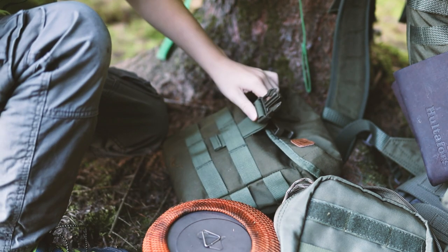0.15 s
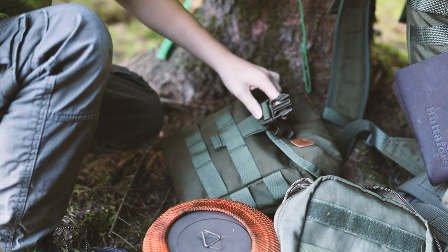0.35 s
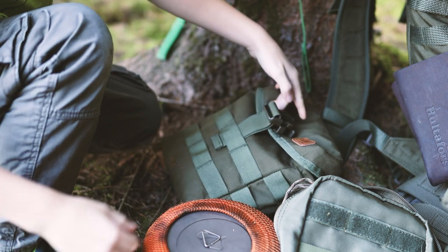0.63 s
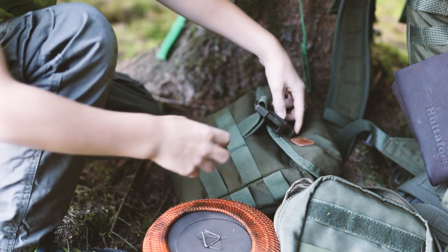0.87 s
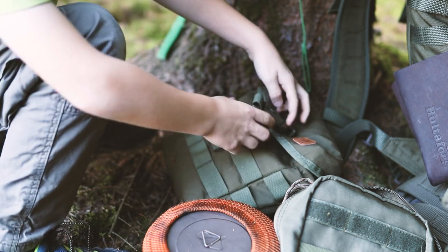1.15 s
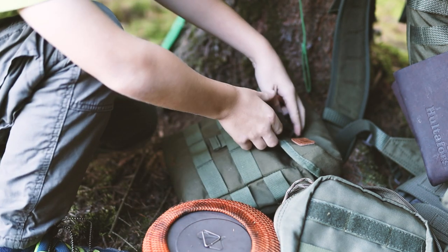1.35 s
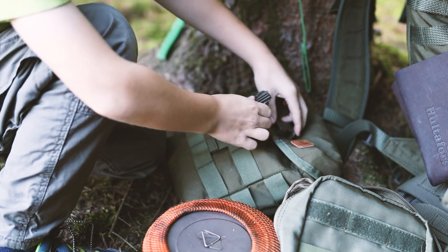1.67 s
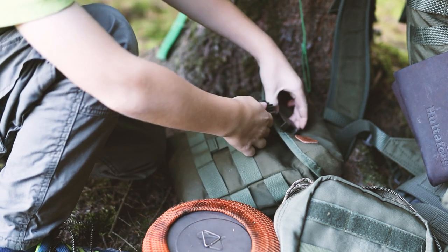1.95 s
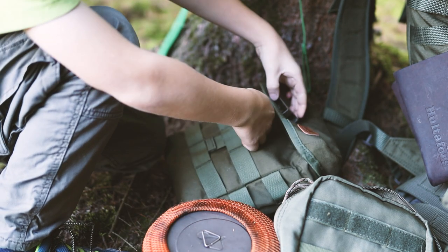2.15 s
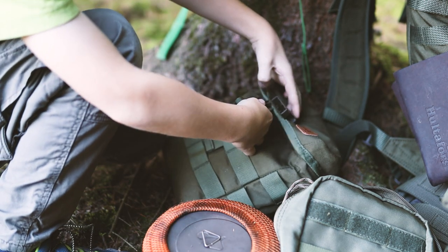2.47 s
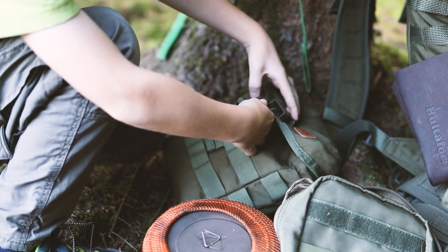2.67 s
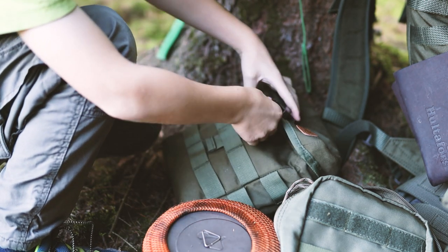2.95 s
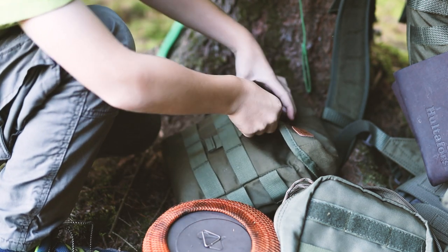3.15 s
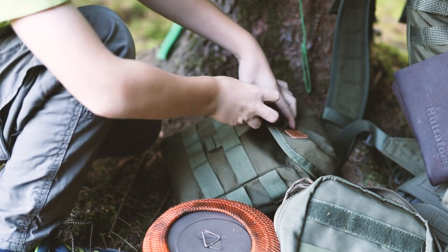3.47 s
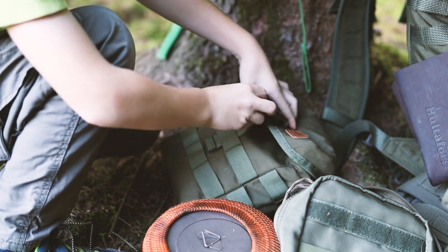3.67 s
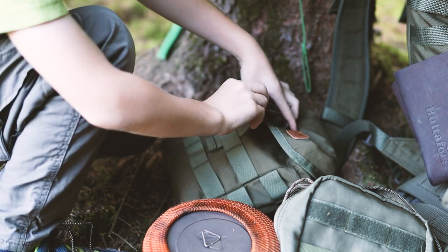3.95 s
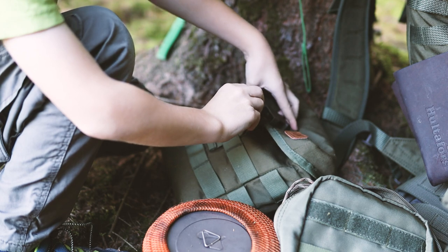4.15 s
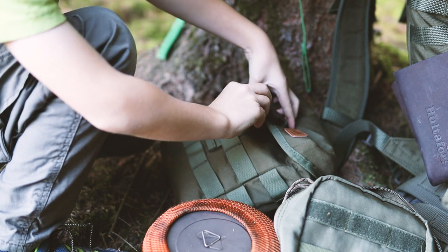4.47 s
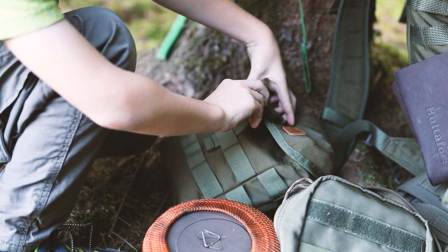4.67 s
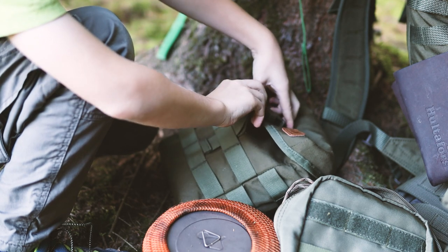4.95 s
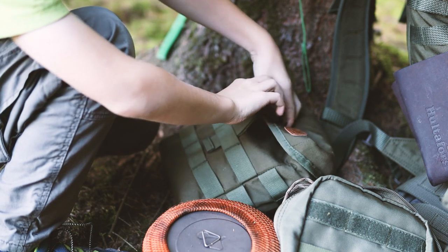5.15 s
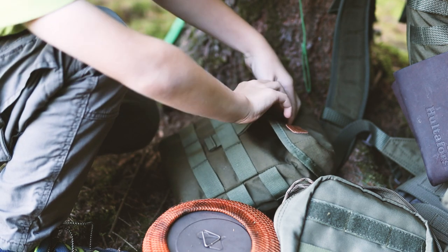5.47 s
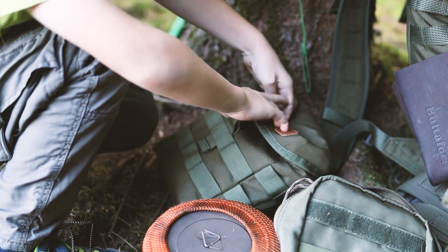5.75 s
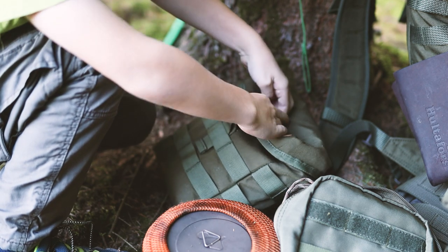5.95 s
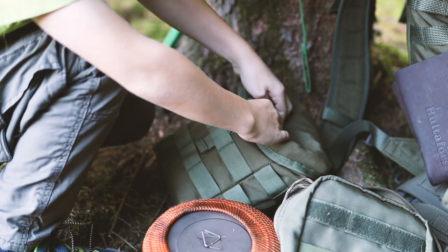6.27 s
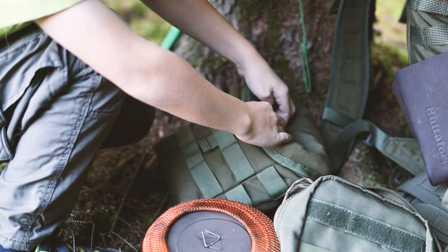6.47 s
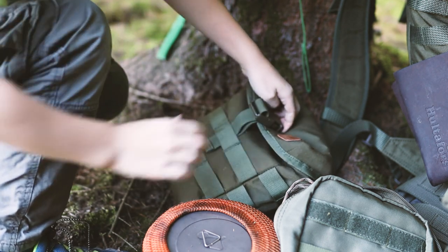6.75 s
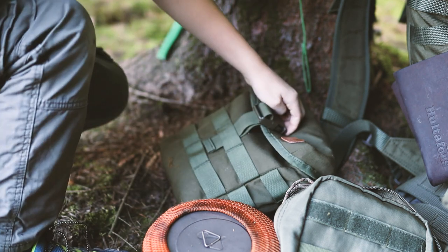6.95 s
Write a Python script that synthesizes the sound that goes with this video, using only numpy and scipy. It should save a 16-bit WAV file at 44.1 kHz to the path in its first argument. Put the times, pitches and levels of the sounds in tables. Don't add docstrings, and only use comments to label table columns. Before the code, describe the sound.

Hands fumble with a plastic buckle, soft cloth rustles and light clicks leading to one loud snap, with faint birdsong in quiet woods.

```python
import sys
import numpy as np
from scipy import signal
from scipy.fft import rfft, irfft
from scipy.io import wavfile
from scipy.ndimage import uniform_filter1d

SR = 44100
rng = np.random.default_rng(int(sys.argv[2]) if len(sys.argv) > 2 else 0)


def level_to_linear(level):
    exponent = np.asarray(level, float) / 20
    return 10 ** exponent


def wrap_up_sound(samples):
    columns = np.atleast_2d(samples).T
    tamed = np.clip(columns, -1, 1)
    steps = np.round(tamed * 32767).astype(np.int16)
    wavfile.write(sys.argv[1], SR, steps)


N = 313992
T = np.arange(N) / SR
SNAP_S, SNAP_DB = 6.2872, -10.5

# frequency [Hz], level [dB], t60 [s].
LATCHED_MODES = [(90, -50.5, 0.054), (172, -27.5, 0.013), (330, -15, 0.017), (554, -21, 0.024),
                 (850, -12, 0.012), (1384, -15.5, 0.014), (1800, -9, 0.028), (2099, -4, 0.025),
                 (2400, -9, 0.037), (2730, -7.5, 0.02), (3370, -1.5, 0.026), (3638, -7.5, 0.029),
                 (3936, -8, 0.027), (4190, -12, 0.027), (4620, -9, 0.02), (4900, -10, 0.027),
                 (5200, -7.5, 0.025), (5488, -6, 0.022), (5800, -8, 0.02), (6410, -12, 0.018),
                 (7120, -12, 0.024), (7560, -8.5, 0.031), (8200, -9, 0.016), (9420, -6, 0.029),
                 (9870, -9, 0.017), (11170, -10, 0.006), (12600, -9, 0.006), (14200, -8.5, .008),
                 (15400, -14, .006)]
# frequency [Hz], level [dB], t60 [s].
BODY_MODES = [(1390, -17, 0.016), (1800, -2.5, 0.01), (2235, -4.5, 0.0093), (2440, 1.5, 0.017),
              (2850, -2.5, 0.0057), (3250, -3.5, 0.0051), (3800, -1, 0.011), (4600, 0, 0.0085)]
# frequency [Hz], level [dB], t60 [s].
WALL_MODES = [(5100, -7.5, 0.0054), (6290, 1, 0.0023), (7000, -6.5, 0.0088), (7500, -1.5, 0.0036),
              (8230, 0, 0.0037), (9770, -8.5, 0.0027), (11700, -11.5, 0.0044), (13790, -11.5, 0.0044)]
# frequency [Hz], level [dB], t60 [s].
PACK_MODES = [(185, -11.5, 0.056), (243, -1, 0.025), (426, 3, 0.016), (646, 4.5, 0.005), (960, 1.5, 0.0053)]

# start [s], peak [dB], thud on the pack [dB], chatter [ms].
CLACKS = [(.8099, -22, -26, 11), (.8788, -36, -14, 3.7), (1.488, -46, -21, 1.7), (4.1624, -51, -11, 6.4),
          (4.8885, -39, -26, 3), (4.8942, -27, -36, 3), (4.9003, -36, -30, 3), (1.3898, -42, -20, 1.5),
          (4.938, -57.5, -4, 3.5), (4.9415, -47, -4, 1.8)]
# start [s], peak [dB], thud on the pack [dB], chatter [ms].
KNOCKS = [(.7035, -39, -14, 3), (1.1088, -39, -12.5, 2.8), (1.275, -40, -41, 3), (.6768, -21, -44, .9),
          (4.8945, -30, -30, 3.5), (4.882, -50, -30, 6), (1.3895, -33.5, -5.5, 36), (1.4203, -36, -24, 8.9),
          (2.2576, -48, -19, 1.3), (2.5752, -50.5, -15, 11), (3.4567, -35.5, -15, 6.1),
          (3.8467, -40, -34, 14), (3.86, -40, -36, 20), (3.8775, -37, -26, 12), (3.9729, -46.5, -23, 5.4),
          (4.121, -37, -29, 3.8), (4.4092, -53, -8, 3.6), (4.436, -48, -22, 4.9), (4.9594, -52.5, -4, 4.5),
          (4.976, -49, -14, 6.8), (5.0217, -49, -10, 11)]
# start [s], peak [dB], thud on the pack [dB], chatter [ms].
SOCKET_KNOCKS = [(.8229, -33, -12.5, 8.4), (1.9709, -39, -9.5, 1.6), (1.9812, -47, 3.5, 5.8),
                 (5.0465, -46.5, -9, 5.3), (4.0655, -53, -9, 2.7), (5.8614, -56, -23, 4.6)]
# start [s], peak [dB], thud on the pack [dB], chatter [ms].
PRONG_TICKS = [(.2773, -44, -1.5, 4), (.3129, -30, -25, 5.5), (1.4136, -36, -12, 2.3),
               (1.5247, -47.5, -21, 3.2), (1.5314, -58, 9.5, 3.1), (3.369, -52, -9, 3.6),
               (3.4126, -43.5, -15, 4.0), (3.862, -33, -35, 16), (4.8945, -24, -27, 2.2),
               (4.4815, -49, -4, 7.3), (5.794, -55, -12, 4.7)]
# start [s], peak [dB], thud on the pack [dB], chatter [ms].
SLIDER_TAPS = [(.028, -60, -15, 2.3), (.264, -48, -3, 3.1), (.2833, -43, -3, 13), (.3006, -38, -24, 9.1),
               (.342, -49, -22, 4.3), (.4628, -51.5, -32, 2.5), (.5222, -54, -25, 3.5),
               (2.27, -55, -10, 4.0), (4.1318, -45, 2.5, 5.8)]
# start [s], peak [dB], thud on the pack [dB], chatter [ms].
HOLLOW_KNOCKS = [(.6774, -24, -32, 1.3), (.6875, -40, -30, 2.3), (.6961, -39, -29, 2.1),
                 (.8012, -46, -30, 2), (.875, -46, -22, 9)]
# start [s], peak [dB], thud on the pack [dB], chatter [ms].
EDGE_TICKS = [(3.486, -38.5, -19, 6), (4.221, -47, -12, 3.7), (4.285, -48, -12, 3.9),
              (4.3306, -55, -18, 2.9), (4.3857, -60, -10, 3), (4.5029, -52, -9, 1.6), (2.493, -59, -18, 3)]
# events, brightness [dB], touched part [Hz], touched part [dB].
CONTACT_KINDS = [
    (CLACKS, 3.1, 2566, -0.76),
    (KNOCKS, -15, 2496, 0.83),
    (SOCKET_KNOCKS, -4, 2500, 1.2),
    (PRONG_TICKS, -8.5, 3850, -0.97),
    (SLIDER_TAPS, -6, 1450, 3),
    (HOLLOW_KNOCKS, -3, 2130, 1.5),
    (EDGE_TICKS, -4, 2820, -2.5),
]

# time [s], effort [dB], lean into the pack [dB].
HANDLING = [(0, -71, 14.5), (.2, -62, 0.5), (.32, -54.5, 12), (.48, -74, 2), (.74, -71.5, 7),
            (.85, -57.5, 15.5), (1.07, -69, -6), (1.38, -59, 7.5), (1.9, -71.5, 6), (2.16, -62.5, 2.5),
            (2.6, -73, 1), (3.8, -86, -0.5), (4.18, -75, -1), (4.7, -75, -3), (5.08, -67, 8.5),
            (5.55, -86, -4), (6.4, -67.5, -0.5), (7.12, -72.5, 6.5)]
# low edge [Hz], high edge [Hz], clumping [dB], level at rest [dB],
# share of effort followed [1], share of lean followed [1].
CLOTH_LAYERS = [
    (169.7, 750, 2, -74, 0.49, 1.0),
    (1100, 8000, 2, -67, 0.96, 0.0),
    (4500, 27000, -0.4, -70.5, 0.18, 0.013),
]
# start [s], length [s], lowest frequency [Hz], level [dB].
STROKES = [(0.274, 0.067, 890, -47.5), (0.845, 0.045, 1480, -54.5), (1.36, 0.079, 1220, -52),
           (1.63, 0.095, 2000, -63), (1.817, 0.054, 1800, -59), (1.98, 0.029, 300, -61),
           (2.563, .045, 1800, -71), (3.104, 0.12, 1800, -65), (3.846, 0.053, 2000, -62.5),
           (4.134, 0.1, 2200, -65), (5.199, 0.091, 1200, -62), (5.483, 0.066, 900, -67.5),
           (5.781, .13, 1210, -59.5), (5.963, 0.21, 1300, -68.5), (5.784, 0.14, 7500, -64),
           (5.792, 0.13, 10500, -67), (6.716, 0.085, 1220, -59.5), (6.811, 0.11, 1800, -60.5)]
# start [s], length [s], centre [Hz], level [dB].
DRAGS = [(0, 0.077, 1230, -65), (1.322, 0.072, 173, -61), (1.734, 0.072, 178, -65),
         (2.09, 0.23, 470, -66.5), (2.152, 0.071, 2120, -66), (2.55, 0.048, 2250, -69),
         (1.746, 0.071, 2300, -68.5), (2.724, .15, 3210, -72.5), (4.121, 0.029, 306, -59),
         (3.454, .014, 1300, -59), (4.886, 0.018, 1100, -54), (4.4, 0.012, 850, -60.5),
         (4.44, 0.0099, 1800, -64), (4.478, 0.0096, 1050, -53.5), (4.479, 0.008, 3750, -52),
         (5.855, .05, 1800, -64), (6.2875, .009, 850, -33), (4.13, .008, 1600, -56),
         (4.676, .005, 6500, -62), (5.01, 0.087, 358, -69), (5.08, 0.17, 3040, -69.5)]
# start [s], length [s], level [dB].
SQUEAKS = [(3.852, 0.045, -50.5), (4.445, 0.036, -60.5)]
# frequency [Hz], t60 [s], level [dB].
WEAVE_MODES = [(2300, 0.0034, -4.5), (4000, 0.00076, 0), (7500, 0.00057, 2), (13000, 0.00049, -7.5)]
# time [s], slip rate [1/s], level [dB].
CREAK = [
    (1.335, 200, -61),
    (1.36, 420, -53.5),
    (1.385, 430, -49),
    (1.4, 870, -41.5),
    (1.412, 840, -48),
    (1.42, 870, -85),
]

# start [s], length [s], start [Hz], top [Hz], level [dB].
HOOKS = [(1.469, 0.062, 4180, 4640, -56.5), (3.177, 0.082, 3900, 4210, -57), (3.37, 0.063, 3810, 4140, -54),
         (3.542, 0.051, 3830, 4020, -58), (4.2, 0.0545, 4000, 4660, -53.5), (4.476, 0.05, 6000, 6800, -64),
         (4.53, .11, 6500, 6700, -72), (1.163, .04, 6300, 6850, -64), (1.254, .04, 6200, 6850, -60),
         (6.778, 0.047, 3800, 4180, -58.5)]
# start [s], length [s], start [Hz], end [Hz], level [dB].
SLIDES = [(1.17, .03, 5000, 5100, -69), (1.505, .04, 5150, 5100, -66), (4.445, .03, 4300, 6000, -71),
          (2.082, 0.075, 8330, 7400, -60.5), (2.71, .068, 7700, 7600, -78), (3.235, 0.07, 6160, 4500, -65),
          (3.345, .03, 3250, 3850, -70), (3.503, .04, 3200, 3850, -66), (3.667, .045, 3140, 3830, -71),
          (3.708, .045, 3860, 4100, -60.5), (4.165, 0.042, 4600, 7500, -70),
          (4.175, 0.033, 2700, 4000, -66), (4.18, .018, 4100, 5500, -67), (4.197, .022, 5500, 5550, -66),
          (5.585, .03, 7200, 6400, -70), (5.7, 0.043, 7400, 6450, -63), (5.848, .057, 7000, 5240, -64),
          (5.995, 0.045, 6700, 5960, -65), (6.035, .015, 5800, 7300, -69), (6.02, .03, 2200, 3800, -71),
          (5.797, .05, 3800, 3800, -68), (6.104, 0.012, 4080, 4750, -58), (6.74, 0.058, 5210, 6400, -64)]
# start [s], level [dB].
CHIRPS = [(2.217, -59), (2.312, -59.5), (2.418, -62)]
# lag [s], length [s], start [Hz], end [Hz], level [dB].
CHIRP_STROKES = [
    (0, 0.03, 5300, 6000, -1.5),
    (0.022, .017, 5250, 7040, -2),
    (0.035, .014, 5300, 5800, -1),
]
# start [s], length [s], start [Hz], top [Hz], end [Hz], level [dB].
ARCH = (6.051, .044, 3996.5, 4786.5, 4149, -54.5)
# start [s], length [s], centre [Hz], level [dB].
TRILLS = [(3.092, 0.088, 7970, -62), (3.292, 0.12, 8030, -58), (3.469, 0.1, 7840, -57),
          (3.642, 0.11, 7850, -59), (3.827, 0.12, 7870, -56), (4.01, 0.097, 7700, -58.5)]

# frequency [Hz], t60 [s].
WOODS_T60_S = [(200, .15), (1000, .35), (2000, .5), (3500, .58), (6000, .4), (7500, .33), (10000, .24),
               (15000, .1)]
# frequency [Hz], density [dB per Hz].
HISS_DB_PER_HZ = [(15, -39.5), (25, -21.5), (123, -2.5), (180, -5.5), (463, -9), (560, -8.5), (659, -11),
                  (1290, -9.5), (1650, -13.5), (2990, -14), (4250, -17.5), (13200, -21.5), (16000, -19.5)]
# frequency [Hz], skirt width [Hz], level [dB].
HUM_LINES = [(59.9, 5.0, -77), (118.3, 12, -73.5)]


def in_time(rows):
    s, *columns = np.transpose(rows)
    return [np.interp(T, s, c) for c in columns]


def rms_one(x):
    return x / np.sqrt(np.mean(x ** 2) + 1e-20)


def at_hz(points, hz):
    table_hz, value = np.transpose(points)
    return np.interp(np.log(hz), np.log(table_hz), value)


def band(x, low_hz, high_hz):
    sos = signal.butter(2, [low_hz, min(high_hz, 19000)], "band", fs=SR, output="sos")
    return signal.sosfilt(sos, x)


def drift(rate_hz):
    r = np.exp(-2 * np.pi * rate_hz / SR)
    noise = rng.standard_normal(N + SR)
    return rms_one(signal.lfilter([1], [1, -2 * r, r * r], noise)[SR:])


def ring(clicks, hz, t60_s):
    r = level_to_linear(-60 / (t60_s * SR))
    w = 2 * np.pi * hz / SR
    return signal.lfilter([0, np.sin(w)], [1, -2 * r * np.cos(w), r * r], clicks + 1e-18)


def chatter(ms, per_s):
    age_s = np.arange(1024) / SR
    slips = rng.standard_normal(1024) * (rng.random(1024) < per_s / SR)
    slips[0] = 3.2
    slips *= np.exp(-age_s * 1000 / max(ms, .3))
    slips *= np.interp(age_s, [0, .001], [.75, 1])
    return slips / np.sqrt(np.sum(slips ** 2))


def strike(modes, starts_s, levels_db, runs, spread_db):
    out = np.zeros(N)
    luck = rng.standard_normal((len(starts_s), len(modes)))
    for k, (hz, mode_db, t60_s) in enumerate(modes):
        drive = np.zeros(N + 1024)
        for s, db, run, z in zip(starts_s, levels_db, runs, luck[:, k]):
            i = round(s * SR)
            drive[i:i + 1024] += level_to_linear(db + mode_db + spread_db * z) * run
        out += (-1) ** k * ring(drive[:N], hz, t60_s)
    return out


def snap():
    starts_s = SNAP_S + np.array([0, .0007, .0026, .0046, .0105, .016])
    levels_db = SNAP_DB + np.array([-8.0, 4.0, -12.5, -12.5, -19.5, -24.5])
    runs = [chatter(ms=.6, per_s=5000.0) for _ in starts_s]
    shell = strike(LATCHED_MODES[5:], starts_s, levels_db, runs, spread_db=2.0)
    blow = [chatter(ms=.3, per_s=0)]
    thud = strike(LATCHED_MODES[:5], [SNAP_S + 0.00056], [SNAP_DB - 3.0], blow, spread_db=-6.0)
    return shell + thud


def grit():
    age_s = T - SNAP_S - .0004
    rattle = rms_one(band(rng.standard_normal(N), 5800, 14500))
    return level_to_linear(-15.5) * rattle * (age_s > 0) * level_to_linear(-60 * np.abs(age_s) / .035)


def buckle():
    contacts = [(*row, *kind) for rows, *kind in CONTACT_KINDS for row in rows]
    s, peak_db, thud_db, ms, bright_db, touched_hz, touched_db = np.transpose(contacts)
    runs = [chatter(m, per_s=9000.0) for m in ms]
    shell = strike(BODY_MODES[:5], s, peak_db - 7.0, runs, spread_db=4.5)
    shell += strike(BODY_MODES[5:], s, peak_db - 9.0 + 0.067 * bright_db, runs, spread_db=1.5)
    shell += strike(WALL_MODES, s, peak_db + bright_db + 0.5, runs, spread_db=2.5)
    for start_s, db, run, hz in zip(s, peak_db + touched_db, runs, touched_hz):
        i = round(start_s * SR)
        shell[i:i + 1024] += level_to_linear(db) * ring(run, hz, t60_s=0.012)
    blows = [chatter(ms=.3, per_s=0)] * len(s)
    thuds = strike(PACK_MODES, s, peak_db + thud_db + 2.0, blows, spread_db=3.5)
    return band(shell, 1370, 19000) + band(thuds, 112, 4000)


def grains(count, per_s, uneven_db):
    sizes = level_to_linear(uneven_db * np.minimum(rng.exponential(1, count), 5))
    signs = rng.choice([-1, 1], count)
    return sizes * signs * (rng.random(count) < per_s / SR)


def cloth():
    out = np.zeros(N)
    clumps = drift(25.0)
    effort_db, lean_db = in_time(HANDLING)
    hands_at_rest_db = -70
    for low_hz, high_hz, clump_db, rest_db, effort_share, lean_share in CLOTH_LAYERS:
        caught = grains(N, per_s=1100.0, uneven_db=-1.0)
        level_db = rest_db + effort_share * (effort_db - hands_at_rest_db) + lean_share * lean_db
        out += level_to_linear(level_db - 5.0 + clump_db * clumps) * rms_one(band(caught, low_hz, high_hz))
    return out


def rubs():
    out = np.zeros(N)
    drag = level_to_linear(2.7 * drift(60.0))
    catches = grains(N, per_s=4700.0, uneven_db=1.5)
    caught = 0.35 * rms_one(catches)
    for hz, t60_s, db in WEAVE_MODES:
        caught = caught + level_to_linear(db) * rms_one(ring(catches, hz, t60_s))
    rows = [(s, d, hz, max(10500, 1.2 * hz), db) for s, d, hz, db in STROKES]
    rows += [(s, d, 2480, 2584, db) for s, d, db in SQUEAKS]
    rows += [(s, d, hz / 1.2, hz * 1.2, db) for s, d, hz, db in DRAGS]
    for s, length_s, low_hz, high_hz, db in rows:
        i, j = max(round(s * SR), 0), round((s + length_s) * SR)
        stroke = np.sin(np.pi * np.arange(j - i) / (j - i)) ** 0.32
        out[i:j] += level_to_linear(db) * stroke * drag[i:j] * rms_one(band(caught[i:j], low_hz, high_hz))
    return out


def creak():
    per_s, level_db = in_time(CREAK)
    turn = 2 * np.pi * np.cumsum(per_s * (1 + 0.089 * drift(216.0))) / SR
    sounding = (T > CREAK[0][0]) & (T < CREAK[-1][0])
    pulses = np.sin(turn) + 0.4 * np.sin(2 * turn)
    return level_to_linear(level_db) * sounding * pulses * level_to_linear(3.3 * drift(140.0))


def note(s, length_s, hz, db):
    i, j = round(s * SR), round((s + length_s) * SR)
    part = np.arange(j - i) / (j - i)
    hoarse_hz = 55.0 * rms_one(uniform_filter1d(rng.standard_normal(j - i), size=90))
    flutter = level_to_linear(2.5 * rms_one(uniform_filter1d(hoarse_hz, size=500)))
    tone = np.sin(2 * np.pi * np.cumsum(hz(part) + hoarse_hz) / SR)
    out = np.zeros(N)
    out[i:j] = level_to_linear(db) * np.sin(np.pi * part) ** .5 * flutter * tone
    return out


def birds():
    slides = list(SLIDES)
    for s, db in CHIRPS:
        slides += [(s + lag_s, d, a, b, db + rel_db) for lag_s, d, a, b, rel_db in CHIRP_STROKES]
    bends = [ARCH]
    for s, d, a, b, db in slides:
        halfway = 0.64 if b > a else .21
        bends.append((s, d, a, a + (b - a) * halfway, b, db))
    out = np.zeros(N)
    for s, d, a, middle, b, db in bends:
        curve = np.polyfit([0, .5, 1], [a, middle, b], 2)
        out += note(s, d, lambda p: np.polyval(curve, p), db)
    for s, d, a, top, db in HOOKS:
        out += note(s, d, lambda p: top - (top - a) * np.exp(-p / 0.28) - 60 * p ** 2, db)
    return out


def buzzer():
    dip_hz, wobble_hz, wobbles_per_s = 480, 290, 75.0
    out = np.zeros(N)
    for s, d, centre_hz, db in TRILLS:
        def pitch(p):
            floor = centre_hz - dip_hz + 750 * np.exp(-p / 0.09) + 260 * p
            width = wobble_hz * np.clip((p - .15) / .3, 0, 1)
            return floor + width * (1 - np.cos(2 * np.pi * wobbles_per_s * d * p))
        out += note(s, d, pitch, db)
    return out


def woods(x):
    age_s = T[:SR]
    tail = np.zeros(SR)
    for low_hz in 150 * 2 ** np.arange(0, 7, .25):
        t60_s = at_hz(WOODS_T60_S, low_hz * 2 ** .125)
        tail += band(rng.standard_normal(SR), low_hz, low_hz * 2 ** .25) * level_to_linear(-60 * age_s / t60_s)
    tail *= np.clip((age_s - .018) / 0.024, .12, 1)
    return signal.fftconvolve(x, tail / np.sqrt(np.sum(tail ** 2)))[:N]


def hiss():
    hz = np.maximum(np.arange(N // 2 + 1) * SR / N, 10)
    spectrum = rfft(rng.standard_normal(N)) * level_to_linear(at_hz(HISS_DB_PER_HZ, hz))
    return level_to_linear(-67) * rms_one(irfft(spectrum, N))


def hum():
    out = np.zeros(N)
    for line_hz, width_hz, db in HUM_LINES:
        t60_s = np.log(1000) / np.pi / width_hz
        skirt = rms_one(ring(rng.standard_normal(N), line_hz, t60_s))
        out += level_to_linear(db) * (np.sin(2 * np.pi * line_hz * T) + 0.25 * band(skirt, 45, 200))
    return out


def scene():
    near = band(snap() + buckle() + cloth() + rubs() + creak() + grit(), 55, 19000)
    far, farther = birds(), buzzer()
    scattered = level_to_linear(-25.5) * near + level_to_linear(-10.5) * far + level_to_linear(-1.0) * farther
    mid = near + far + farther + woods(scattered) + hiss() + hum()
    thin_hiss = rms_one(band(band(rng.standard_normal(N), 3500, 12600), 3000, 12800))
    side = level_to_linear(-33.0) * band(woods(near), 3000, 12000)
    side += level_to_linear(-33.0) * band(drift(150.0) * near, 700, 12500)
    side += level_to_linear(-84.0) * thin_hiss
    side += level_to_linear(-21.0) * band(hiss(), 200, 1200)
    return np.array([mid + side, mid - side])


def top_cut(x):
    return signal.sosfilt(signal.butter(12, 16550, fs=SR, output="sos"), x)


def record(dry):
    cut = signal.sosfilt(signal.cheby2(6, 30, 17100, fs=SR, output="sos"), dry)
    return top_cut(np.clip(cut, -1, 1))


dry = scene()
out = record(dry)
wrap_up_sound(out)
```